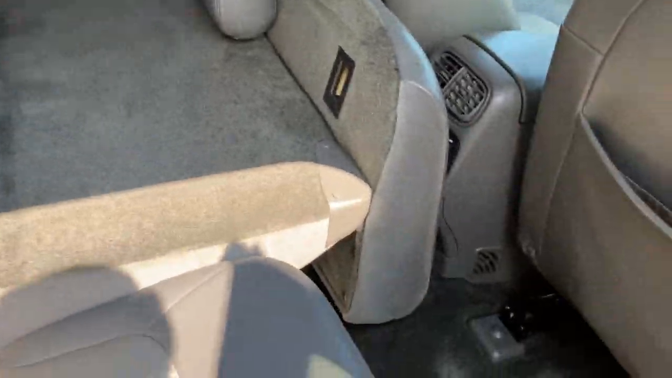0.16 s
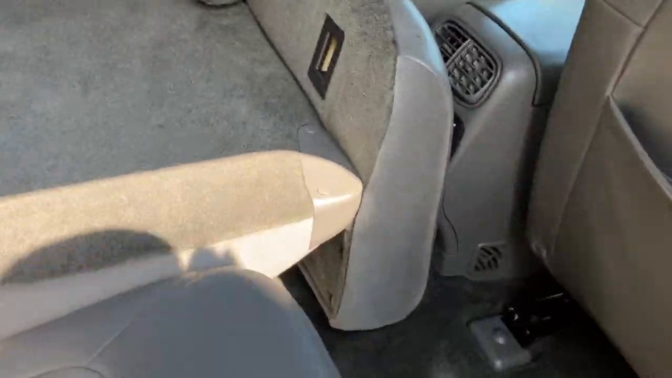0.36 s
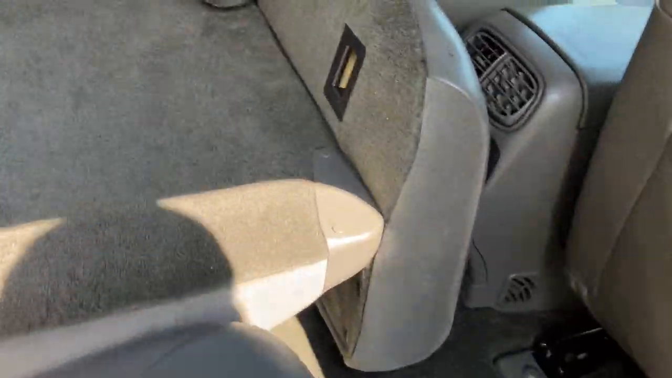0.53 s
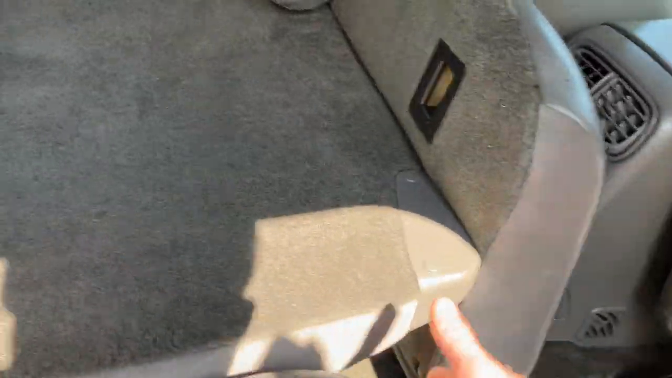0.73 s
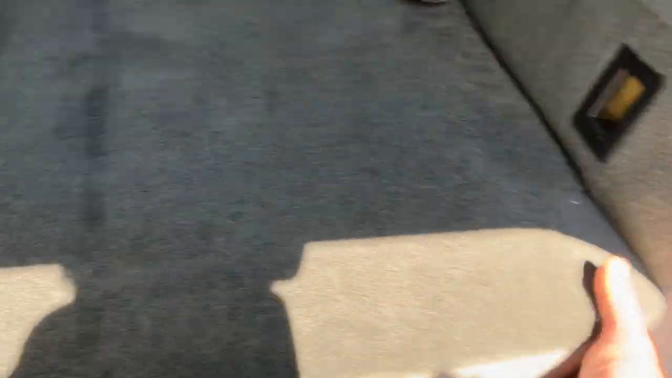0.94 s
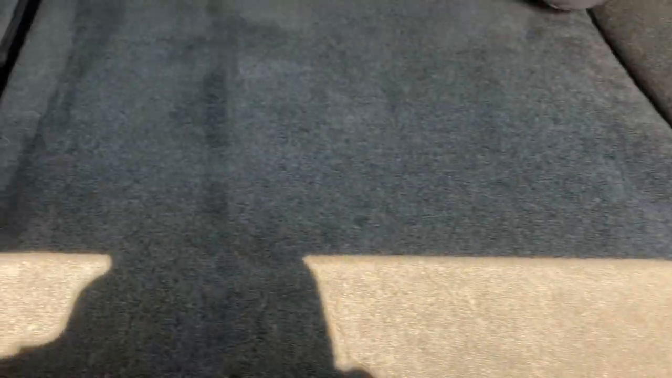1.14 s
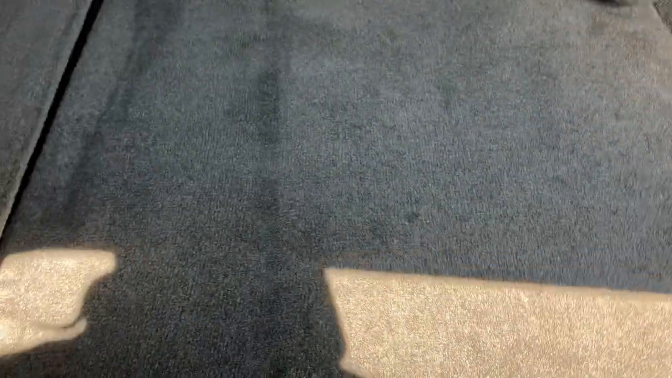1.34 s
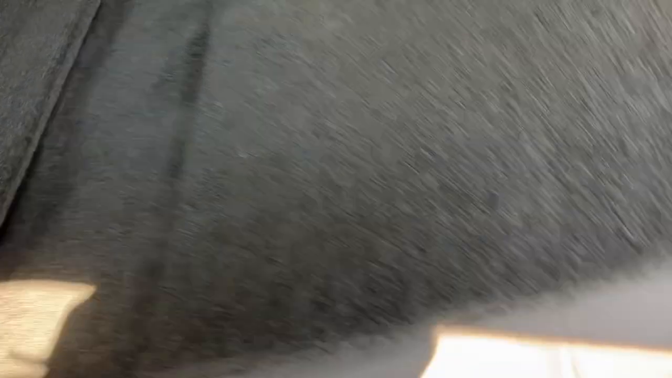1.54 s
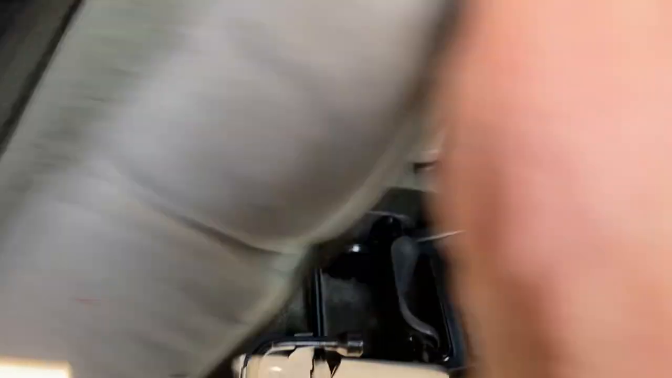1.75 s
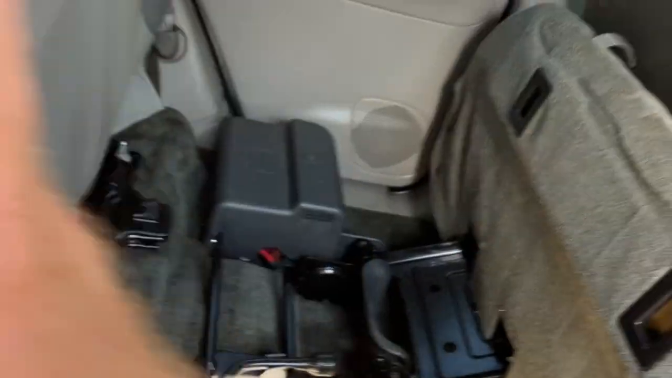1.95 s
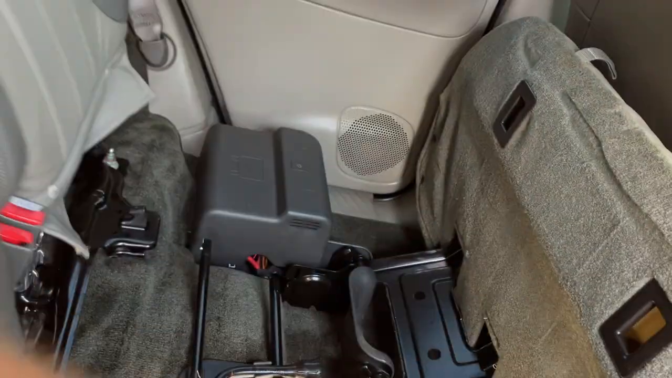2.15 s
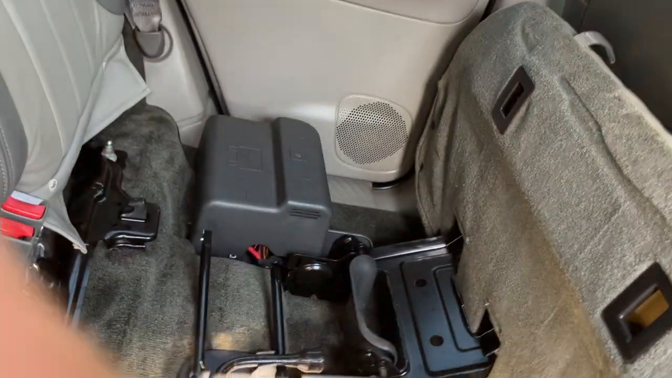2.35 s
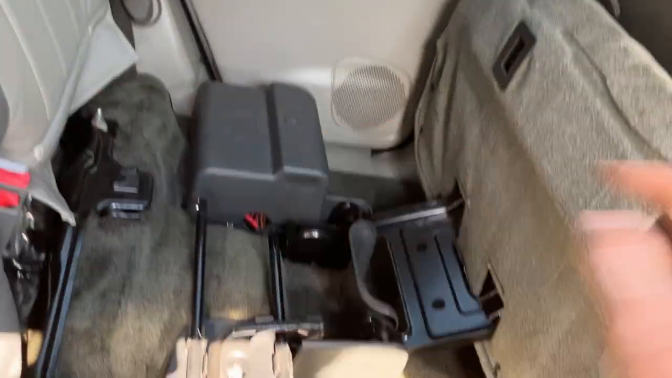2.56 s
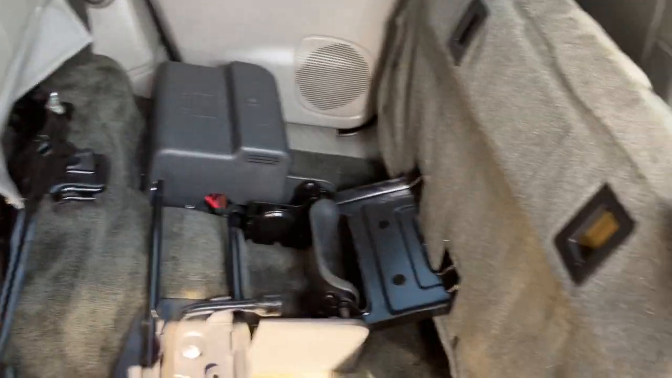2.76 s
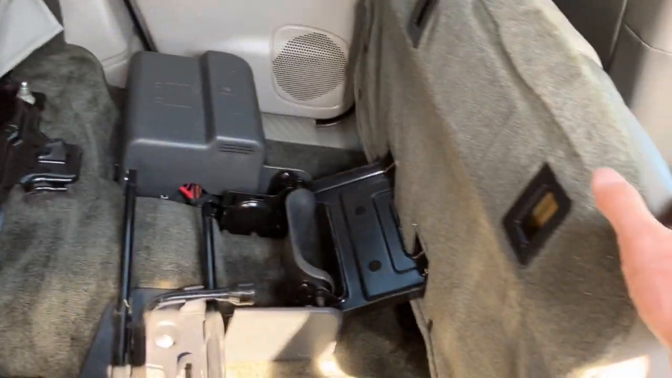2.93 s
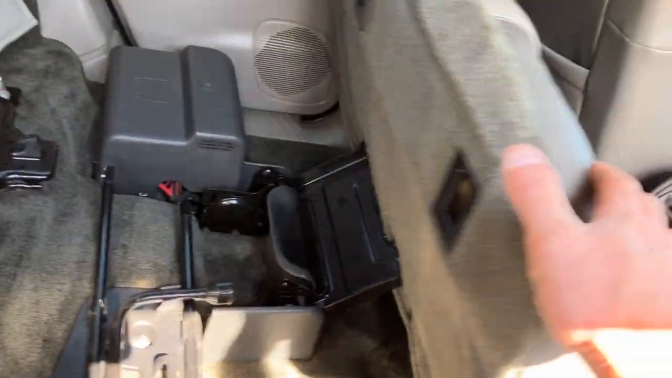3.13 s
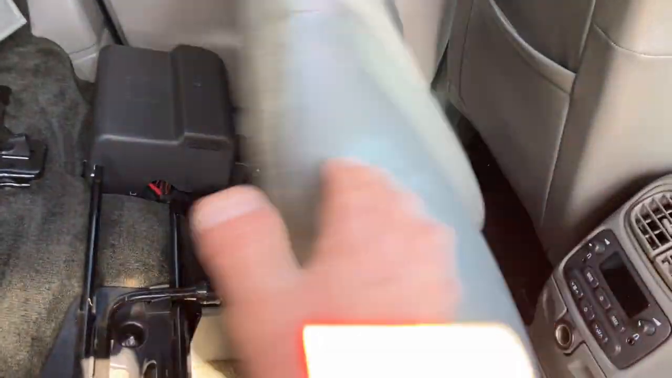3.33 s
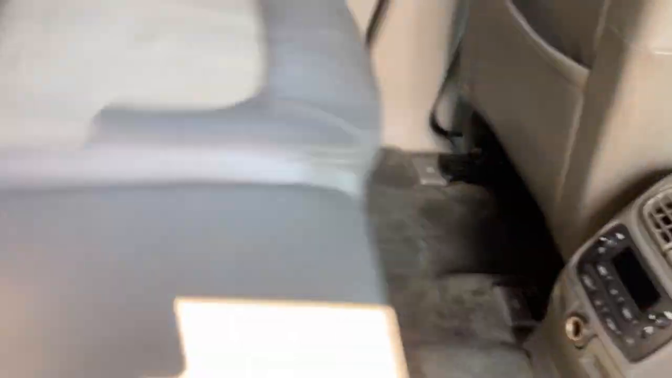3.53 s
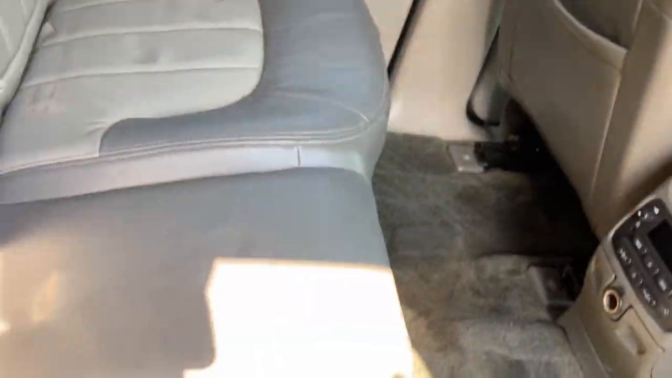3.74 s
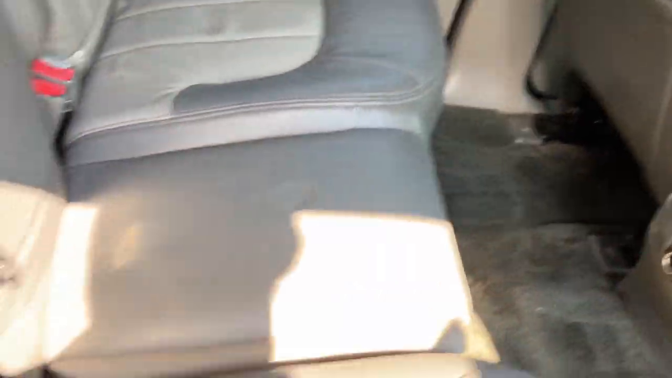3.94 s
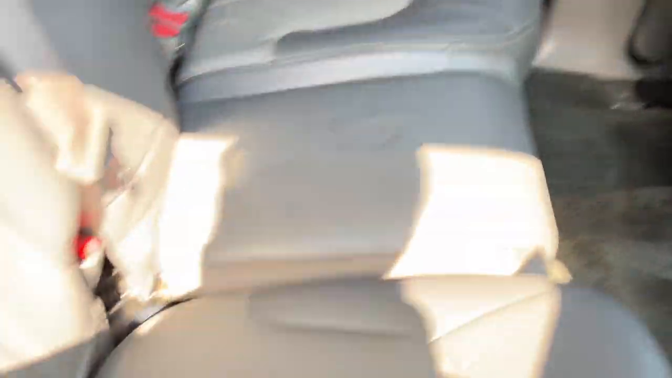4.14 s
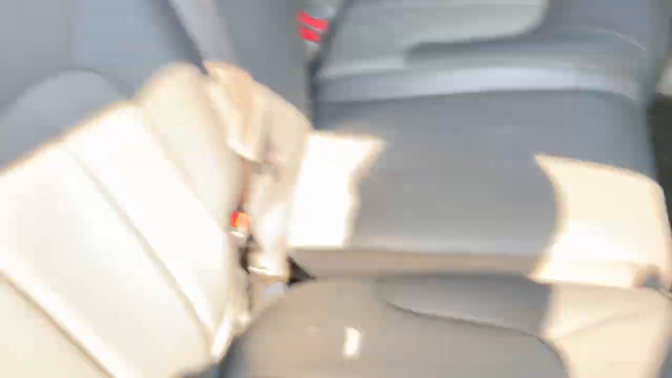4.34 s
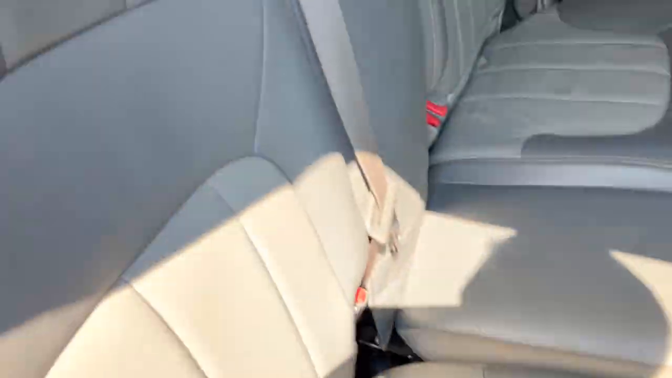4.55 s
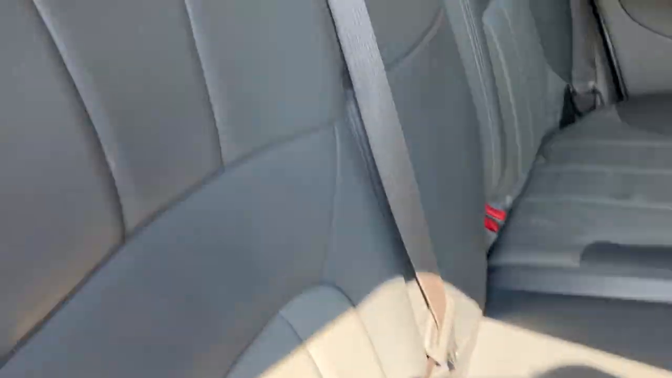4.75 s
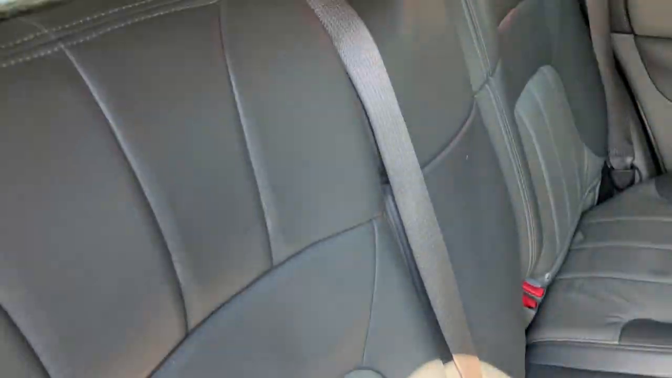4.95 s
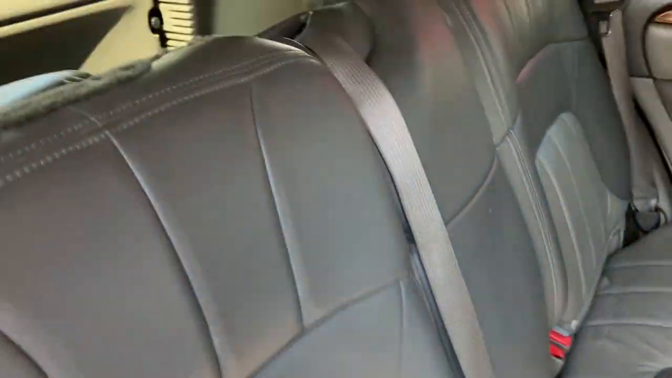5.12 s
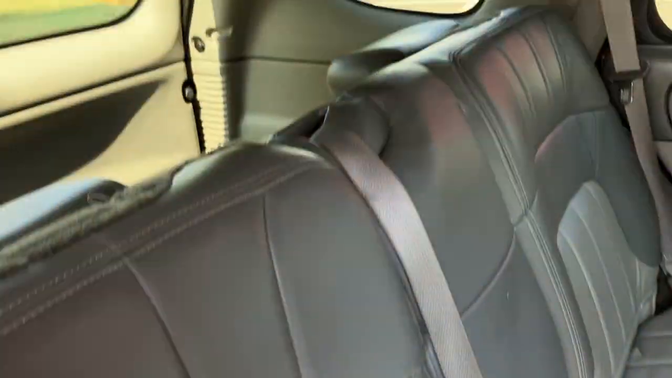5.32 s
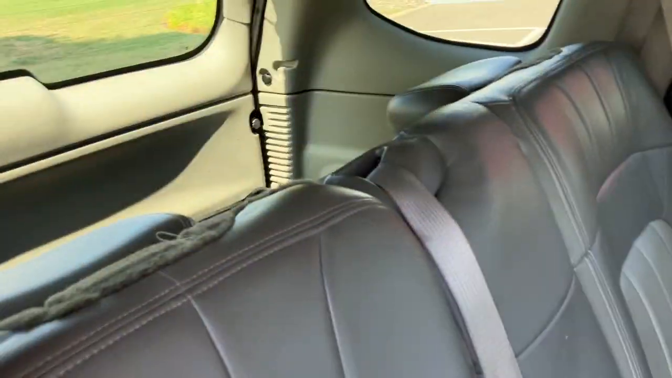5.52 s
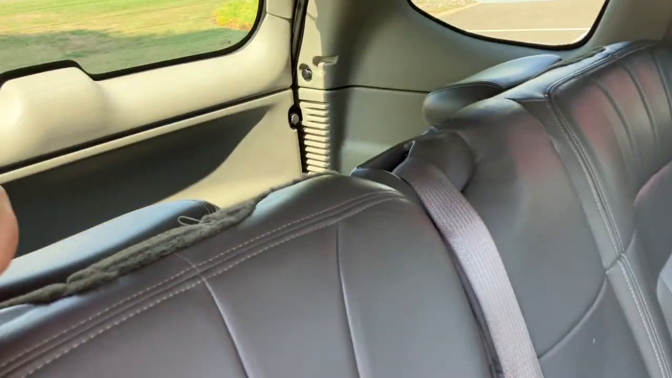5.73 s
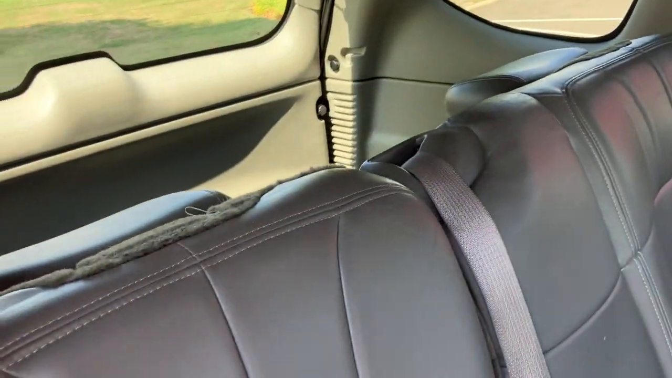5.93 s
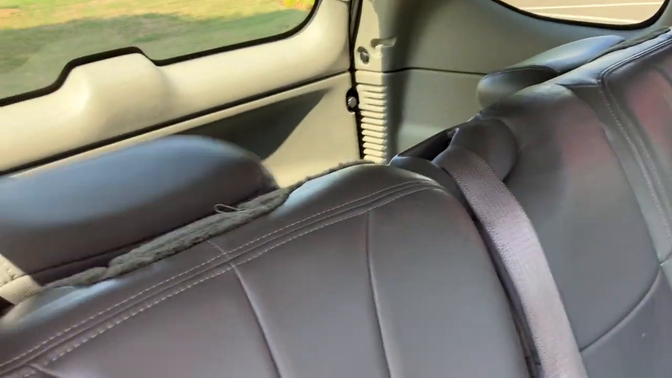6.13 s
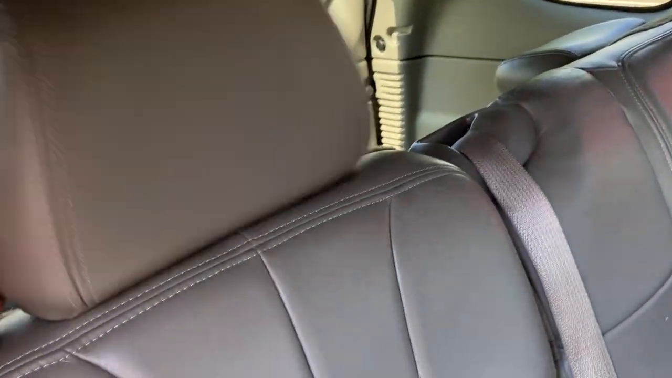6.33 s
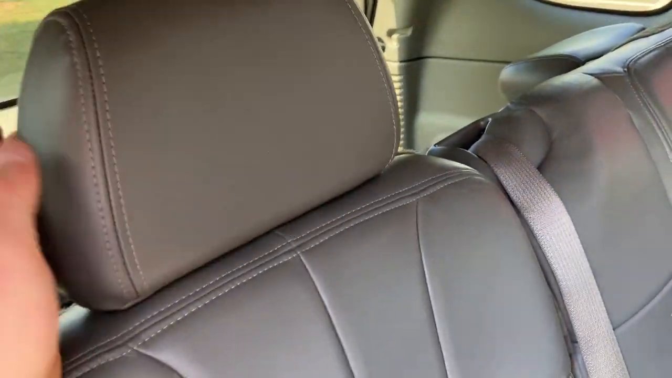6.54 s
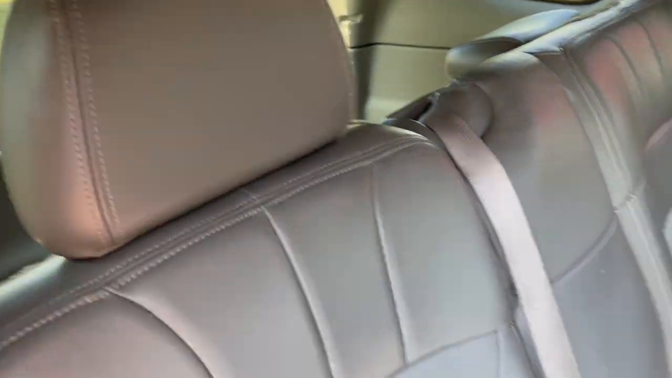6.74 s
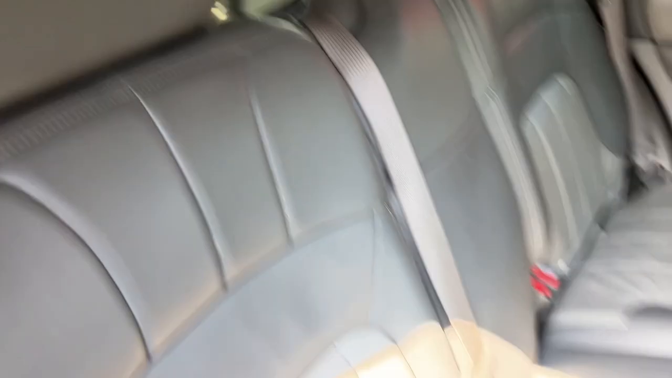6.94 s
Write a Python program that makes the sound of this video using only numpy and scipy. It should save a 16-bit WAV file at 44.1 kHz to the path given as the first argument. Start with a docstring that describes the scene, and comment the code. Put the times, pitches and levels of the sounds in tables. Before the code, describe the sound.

A hand-held stereo microphone sits close to a folding rear seat in a small, padded cabin. Fabric rustles and light bumps lead to a creak, a heavy metallic clunk and rattling springs. After a lull, an even little ratchet precedes a loud, dry cushion slap. Padded bumps and webbing sliding follow, then more brushing and a firm headrest knock with muffled thuds.

```python
"""Inside a parked car, close to a hand-held microphone with two ports, a folding rear seat is put back up.
The back creaks upright in uneven slips and bangs into its steel latch; the cushion ticks over on its hinge
and slaps down; a headrest is swung up and knocks home. Padded blows are short pushes that boom in the cabin,
hard blows are noise bursts that ring the frame. Hands brush the upholstery and a belt slides, as shaped noise."""
import sys
import numpy as np
from scipy import signal
from scipy.fft import rfft, irfft, next_fast_len
from scipy.io import wavfile
from scipy.ndimage import uniform_filter1d

SR = 44100
rng = np.random.default_rng(int(sys.argv[2]) if len(sys.argv) > 2 else 0)


def to_wav(sig):
    """Store sig (one row per channel, or 1-D mono) as 16-bit WAV at the path in sys.argv[1].

    Samples outside -1..1 are clipped; the rate is SR.
    """
    pcm = np.clip(np.atleast_2d(sig), -1, 1) * 32767
    pcm = np.round(pcm).astype(np.int16)
    wavfile.write(sys.argv[1], SR, pcm.T)  # frames by channels


N = 307818
TIME = np.arange(N) / SR


def amp(db):
    """Decibels to gain."""
    return 10 ** (np.asarray(db) / 20)


def evened(x):
    """Scaled to an rms of one."""
    return x / np.sqrt(np.mean(x ** 2) + 1e-20)


def read(points, hz):
    """A table joined by straight lines over log frequency."""
    f, value = np.transpose(points)
    return np.interp(np.log(hz + 1), np.log(f + 1), value)


def add(mix, s, sound):
    """Mixes a sound in at a time in seconds, cutting what runs past the end."""
    part = mix[..., round(s * SR):][..., :sound.shape[-1]]
    part += sound[..., :part.shape[-1]]


def noise(colour, size=N, tilt_db=0):
    """Two unrelated noises of one colour and rms one, tilted in dB per octave about 1 kHz."""
    n = next_fast_len(size)
    hz = np.fft.rfftfreq(n, 1 / SR)
    octaves = np.log2(np.maximum(hz, 250) / 1000)  # the tilt stops below 250 Hz
    spectrum = rfft(rng.standard_normal((2, n))) * amp(read(colour, hz) + tilt_db * octaves)
    return evened(irfft(spectrum, n)[:, :size])


def flutter(seconds):
    """Smooth random wobble of rms one that changes over the given time."""
    size = max(2, int(seconds * SR))
    once = uniform_filter1d(rng.standard_normal(N), size)
    return evened(uniform_filter1d(once, size))


def swell(start, length, rise):
    """A sliding movement: it speeds up, holds and slows to a stop."""
    release_share = 0.42  # the hand slows and lifts over this last part of a stroke
    up = np.clip((TIME - start) / max(rise, 1e-3), 0, 1)
    down = np.clip((start + length - TIME) / (release_share * length), 0, 1)
    return (np.sin(np.pi / 2 * up) * np.sin(np.pi / 2 * down)) ** 2


def ring(x, modes):
    """The ringing of damped modes driven by x; each has its gain at its own pitch."""
    t = np.arange(SR // 2) / SR
    response = 0
    for hz, db, t60 in modes:
        damping = np.log(1000) / t60
        decay = np.exp(-damping * t)
        response = response + amp(db) * 2 * damping / SR * decay * np.cos(2 * np.pi * hz * t)
    return signal.oaconvolve(x, response[None], axes=1)[:, :N]


# springs and trim rattling on: (frequency [Hz], time to fall 60 dB [s])
TAIL_T60 = [(300, 0.65), (1000, 0.29), (4000, 0.36), (14000, 0.37)]


def rattle(x):
    """A diffuse noise tail, scaled to unit energy in its first row, whose low end lasts longest."""
    hz, t, z = signal.stft(rng.standard_normal((2, SR // 2)), SR, nperseg=256)
    fading = z * amp(-60 * t / read(TAIL_T60, hz)[:, None])
    tail = signal.istft(fading, SR, nperseg=256)[1]
    return signal.oaconvolve(x, tail / np.linalg.norm(tail[0]), axes=1)[:, :N]


# still air of the parked car: (frequency [Hz], level per Hz [dB])
AIR_COLOUR = [(20, -15), (70, 5), (250, -5), (400, -10), (490, -12), (700, -17), (1500, -23), (4000, -28.5),
              (7500, -34), (10000, -40.5), (16000, -59)]
# a faint, narrow hum in the cabin: (frequency [Hz], level per Hz [dB])
HUM_COLOUR = [(330, -60), (395, -12), (412, 0), (430, -12), (500, -60)]


def still_air(air_db=-55, hum_db=-65):
    """The quiet cabin all around: steady air noise and a hum made of narrow-band noise."""
    return amp(air_db) * noise(AIR_COLOUR) + amp(hum_db) * noise(HUM_COLOUR)


# low rumble as the seat's weight shifts, before the trim: (time [s], level [dB])
SHIFTING = [(0, -44), (.45, -45), (0.682, -75), (1.05, -53.5), (1.25, -38.5), (1.85, -42.5), (2.3, -38.5),
            (3.0, -49), (3.52, -42), (3.68, -31), (4.099, -41), (4.8, -47.5), (5.5, -47.5), (5.92, -32),
            (6.25, -58), (6.42, -34), (6.75, -37), (6.92, -60)]
# its colour: (frequency [Hz], level per Hz [dB])
SHIFT_COLOUR = [(15, -37.5), (35, 1.5), (65, 2.5), (140, -2.5), (220, -13), (280, -12), (400, -21.5),
                (600, -31), (1500, -53)]


def shifting(trim_db=-1):
    """Low rumble of the seat moving on its springs: dark noise that follows the weight."""
    s, db = np.transpose(SHIFTING)
    return amp(np.interp(TIME, s, db) + trim_db) * noise(SHIFT_COLOUR)


# the seat belt running off its reel: (start [s], length [s], rise [s], level [dB])
BELT = [(4.423, 0.54, 0.014, -64.5), (5.014, 0.44, 0.086, -62)]
# colour of the webbing: (frequency [Hz], level per Hz [dB])
BELT_COLOUR = [(700, -21.5), (1350, -9.5), (1620, 4), (1900, -8), (2900, -11.5), (3700, -13.5), (4600, -13),
               (7500, -19), (16000, -37)]


def belt():
    """Webbing slides through its guide with a faint, whistling rasp."""
    level = sum(amp(db) * swell(start, length, rise) for start, length, rise, db in BELT)
    return level * noise(BELT_COLOUR)


# a sleeve swishing over smooth leather: (start [s], length [s], rise [s], pitch [Hz], level [dB])
SWISHES = [(1.953, 0.13, 0.018, 1610, -48), (5.576, 0.26, 0.074, 4850, -51), (6.477, .15, 0.016, 2424, -53)]


def swishes(width_octaves=0.41, skirt_db=-14):
    """Rubbing noise in one narrow band, falling by skirt_db for each width away from its pitch."""
    out = np.zeros((2, N))
    for start, length, rise, hz, db in SWISHES:
        band = [(hz * 2 ** (k * width_octaves), skirt_db * abs(k)) for k in (-4, 0, 4)]
        out += amp(db) * swell(start, length, rise) * noise(band)
    return out


def wander(x, depth_db):
    """The colour of the rub drifts as the contact moves over seams and padding."""
    z = signal.stft(x, nperseg=1024, noverlap=768)[2]
    patches = rng.standard_normal(z.shape[1:])
    for _ in range(2):
        across_pitch = uniform_filter1d(patches, size=6, axis=0)
        patches = uniform_filter1d(across_pitch, size=16, axis=1)
    drifting = z * amp(depth_db * evened(patches))
    return evened(signal.istft(drifting, nperseg=1024, noverlap=768)[1][:, :N])


def snags(per_s=45, level_db=-0.5, t60=0.004):
    """Seams catching under the hand: sparse, dry ticks of uneven size, levelled against the rub."""
    t = np.arange(SR // 40) / SR
    clicks = (rng.random(N) < per_s / SR) * rng.standard_normal(N)
    tick = noise(TICK_COLOUR, size=len(t)) * np.exp(-np.log(1000) * t / t60)
    return amp(level_db) * signal.oaconvolve(clicks[None], tick, axes=1)[:, :N]


# hand and sleeve stroking the upholstery, levels before the trims:
# (start [s], length [s], rise [s], dull drag [dB], rub [dB], hiss of the nap [dB])
STROKES = [(0.354, 0.28, 0.012, -51, -53, -55.5), (0.579, 0.23, 0.099, -53, -53.5, -48),
           (0.81, 0.26, 0.076, -55, -51.5, -51.5), (1.009, 0.19, 0.072, -60, -60, -59),
           (1.138, .37, 0.13, -45.5, -47.5, -53), (1.453, 0.24, 0.028, -50, -55, -61.5),
           (1.619, 0.21, 0.042, -49.5, -49, -46), (1.778, 0.21, 0.12, -38.5, -53.5, -56),
           (1.947, 0.25, 0.052, -48, -40, -53), (2.36, 0.33, 0.013, -58, -64, -70.5),
           (2.798, .15, 0.026, -56.5, -55.5, -64.5), (3.384, 0.19, 0.14, -65, -48.5, -54),
           (3.712, .27, 0.089, -54, -41, -42.5), (3.932, 0.36, 0.13, -49, -46.5, -54),
           (4.231, 0.23, 0.043, -55, -57, -62), (5.473, .18, 0.09, -67, -58.5, -62.5),
           (5.579, 0.44, 0.065, -48.5, -50.5, -49.5), (5.896, 0.32, 0.026, -53, -62, -74),
           (6.096, 0.42, 0.15, -48.5, -45.5, -46.5), (6.481, .18, .03, -67, -50.5, -50.5),
           (6.617, 0.4, 0.054, -62, -57, -66.5)]
# colour of a heavy drag over padding: (frequency [Hz], level per Hz [dB])
DRAG_COLOUR = [(150, -3.5), (340, 1), (500, -1.5), (680, -6), (900, -6), (1400, -14), (4000, -40.5)]
# colour of the rub: (frequency [Hz], level per Hz [dB])
RUB_COLOUR = [(500, -13.5), (900, -4.5), (1400, -1), (2000, -0.5), (3000, -0.5), (5000, -7.5), (8000, -10),
              (16000, -47)]
# colour of the nap's hiss: (frequency [Hz], level per Hz [dB])
NAP_COLOUR = [(1000, -27.5), (3000, -9.5), (5000, 0.5), (8000, 2.5), (12000, 5), (15000, 1.5)]


def upholstery(rub_trim_db=-1, nap_trim_db=1, catch_db=1.34, grain_db=2, judder_db=3):
    """Rubbed cloth: a dull drag, a rub and a bright hiss, all roughened as fibres catch and let go."""
    power = 0
    for start, length, rise, *levels_db in STROKES:
        power = power + np.outer(amp(levels_db), swell(start, length, rise)) ** 2
    drag, rub, nap = np.sqrt(power)
    drag = drag * evened(amp(judder_db * flutter(0.0066)))
    catching = evened(amp(catch_db * flutter(0.036) + grain_db * flutter(0.00026)))
    dull = drag * wander(noise(DRAG_COLOUR), depth_db=2.0)
    rubbing = amp(rub_trim_db) * rub * (wander(noise(RUB_COLOUR), depth_db=3.4) + snags())
    hiss = amp(nap_trim_db) * nap * wander(noise(NAP_COLOUR), depth_db=-2.6)
    return catching * (dull + rubbing + hiss)


# leather squeaking as it is squeezed: (time [s], length [s], mean pitch [Hz], level [dB])
SQUEAKS = [(0.772, 0.042, 1450, -56), (1.987, 0.1, 680, -42.5), (3.518, 0.011, 509, -40.5)]


def squeaks(waver=0.04):
    """Short wavering tones of leather sliding on leather."""
    out = np.zeros((2, N))
    for s, length, hz, db in SQUEAKS:
        size = int(length * SR)
        turns = np.cumsum(hz * (1 + waver * flutter(.003)[:size])) / SR
        add(out, s, amp(db) * signal.windows.tukey(size, .5) * np.sin(2 * np.pi * turns))
    return out


# the hinge sticking and slipping as the back rises: (time [s], mean rate [slips/s], mean level [dB])
CREAK = [(1.623, 24, -42), (1.70, 25, -41), (1.745, 50, -41), (1.80, 72, -41), (1.87, 74, -35),
         (1.90, 72, -37)]
# each slip runs along the frame, treble first
SLIP_HZ, SLIP_END_HZ, SLIP_GLIDE_S, SLIP_DECAY_S = 2300, 370, .0015, .002


def creak(uneven=.035, scatter_db=2):
    """Uneven slips of the hinge, quickening as the back swings up; each is a tiny falling chirp."""
    s, rate, db = np.transpose(CREAK)
    turns = np.cumsum(np.interp(TIME, s, rate, left=0) * (1 + uneven * flutter(.01))) / SR
    level = np.interp(TIME, s, amp(db), left=0, right=0)
    slips = np.diff(np.floor(turns), prepend=0) * level  # one impulse per whole turn
    slips = slips * amp(scatter_db * rng.standard_normal(N))
    t = np.arange(SR // 20) / SR
    hz = SLIP_END_HZ + (SLIP_HZ - SLIP_END_HZ) * np.exp(-t / SLIP_GLIDE_S)
    fade = (1 + t / SLIP_DECAY_S) * np.exp(-t / SLIP_DECAY_S)
    slip = fade * np.sin(2 * np.pi * np.cumsum(hz) / SR)
    return np.tile(signal.oaconvolve(slips, slip)[:N], (2, 1))


# modes of the seat's steel frame, before each part's ring level:
# (frequency [Hz], gain [dB], time to fall 60 dB [s])
FRAME = [(432, -5, .2), (689, 3, .2), (808, 7, .2), (1020, 5, .1), (1179, 3, .14), (1268, 7, .12),
         (1819, 5, .1), (1975, 5, .1), (2178, 9, .08), (2440, 8, .08), (2599, 9, .1), (3339, 6, .12),
         (3515, 6, .12), (4140, 3, .1), (4672, 7, .1), (6302, 6, .1), (7397, 8, .1)]


def strikes(rows, colour, ring_db, tail_db, chatter_db):
    """Hard contacts: a burst of tiny collisions, as noise, that rings the steel frame and leaves a rattle."""
    out, t = np.zeros((2, N)), np.arange(SR // 5) / SR
    for s, db, rise, t60, tilt_db in rows:
        shape = (1 - np.exp(-t / max(rise, 1e-4))) * np.exp(-np.log(1000) * t / t60)
        burst = noise(colour, size=len(t), tilt_db=tilt_db)
        add(out, s, amp(db) * shape / shape.max() * burst)
    out = out * evened(amp(chatter_db * flutter(0.0004)))
    return out + amp(ring_db) * ring(out, FRAME) + amp(tail_db) * rattle(out)


# small hinge and buckle ticks: (time [s], level [dB], time to fall 60 dB [s], tilt [dB/octave])
TICKS = [(.115, -52, 0.024, 3), (.764, -44, 0.027, -5), (0.795, -46, 0.019, 9), (1.475, -36.5, 0.035, -8),
         (1.581, -39.5, 0.017, -0.5), (1.618, -42, 0.032, -1), (2.742, -48.5, 0.13, 6.5),
         (3.119, -47.5, 0.019, 1), (3.154, -47.5, 0.019, 1), (3.371, -43.5, 0.075, -3),
         (3.391, -40, .03, -1.5), (3.406, -38.5, 0.18, -6.5), (4.438, -46, 0.048, 0),
         (4.463, -50, .039, 1.5), (5.150, -40, 0.014, .5)]
# their colour: (frequency [Hz], level per Hz [dB])
TICK_COLOUR = [(250, -1), (600, -1.5), (1400, 1), (3000, -4), (4600, -13.5), (6500, -19.5), (16000, -32)]
TICK_RISE_S = .0005
# the cushion's hinge ratchets evenly as it swings down
RATCHET_START_S, RATCHET_GAP_S, RATCHET_COUNT, RATCHET_RISE_S = 3.1795, .0418, 5, .0013
# level of the first tick, change per tick, ring time, tilt per octave
RATCHET_DB, RATCHET_FADE_DB, RATCHET_T60_S, RATCHET_TILT_DB = -43, -1.8, 0.047, 1.5
# loose links and springs clatter on after the latch shuts
CLATTER_START_S, CLATTER_S, CLATTER_COUNT, CLATTER_T60_S = 2.17, .26, 16, 0.042
CLATTER_DB, CLATTER_FALL_DB_PER_S, CLATTER_TILT_DB = -22, -105, -7  # tilt per octave


def ticks():
    """Hard contacts of small parts: single ticks, the hinge's fading ratchet and the loose clatter."""
    rows = [(s, db, TICK_RISE_S, t60, tilt_db) for s, db, t60, tilt_db in TICKS]
    for k in range(RATCHET_COUNT):
        s, db = RATCHET_START_S + k * RATCHET_GAP_S, RATCHET_DB + k * RATCHET_FADE_DB
        rows.append((s, db, RATCHET_RISE_S, RATCHET_T60_S, RATCHET_TILT_DB))
    # one clatter at a random moment in each of equal slots
    ages = CLATTER_S * (np.arange(CLATTER_COUNT) + rng.random(CLATTER_COUNT)) / CLATTER_COUNT
    for age in ages:
        db = CLATTER_DB + CLATTER_FALL_DB_PER_S * age
        rows.append((CLATTER_START_S + age, db, TICK_RISE_S, CLATTER_T60_S, CLATTER_TILT_DB))
    return strikes(rows, TICK_COLOUR, ring_db=-6.5, tail_db=-8.5, chatter_db=1)


# the headrest knocking on its stop:
# (time [s], level [dB], rise [s], time to fall 60 dB [s], tilt [dB/octave])
HEADREST = [(5.628, -41.5, 0.00089, 0.058, -4), (5.940, -33.5, 0.001, 0.045, -10.5),
            (5.986, -43, 0.00082, 0.072, -4.5), (6.197, -36, 0.0028, 0.073, 0),
            (6.362, -22, 0.003, 0.036, -0.5), (6.371, -23, 0.0011, 0.07, -1)]
# its colour when struck: (frequency [Hz], level per Hz [dB])
HEADREST_COLOUR = [(250, -16.5), (400, -4), (620, -10), (950, 0), (1400, -25), (2000, -10), (2800, -10.5),
                   (5500, -17), (7500, -14.5), (11000, -22.5), (16000, -23)]


def headrest():
    """Hard knocks of the headrest, with little frame ring."""
    return strikes(HEADREST, HEADREST_COLOUR, ring_db=-11, tail_db=-13.5, chatter_db=1.5)


# the cushion slapping onto its base:
# (time [s], level [dB], rise [s], time to fall 60 dB [s], tilt [dB/octave])
CUSHION = [(3.554, -31.5, 0.0016, 0.1, 2), (3.569, -27.5, 0.017, 0.12, 0), (3.582, -24.5, 0.0015, .04, 13),
           (3.587, -11.5, 0.0028, 0.039, -0.5), (3.594, -1.5, 0.0046, 0.046, -2),
           (3.602, -24.5, 0.0012, 0.014, -5.5), (3.650, -28.5, 0.0061, 0.034, -2.5)]
# its colour when struck: (frequency [Hz], level per Hz [dB])
CUSHION_COLOUR = [(160, -29.5), (255, 3.5), (400, -10), (600, -9), (850, -14.5), (1250, -7.5),
                  (1490, -18.5), (2640, -12.5), (2770, -14.5), (4020, -21.5), (8360, -21), (8920, -31.5),
                  (11000, -27.5), (16000, -32)]


def cushion():
    """The slap of the cushion, rough in level and the driest of the hard contacts."""
    return strikes(CUSHION, CUSHION_COLOUR, ring_db=-17, tail_db=-19.5, chatter_db=4)


# the steel latch snapping and rattling:
# (time [s], level [dB], rise [s], time to fall 60 dB [s], tilt [dB/octave])
LATCH = [(1.786, -30, .003, 0.022, 4.5), (1.984, -32.5, 0.0006, 0.018, 2.5),
         (2.096, -19, 0.00023, 0.075, 1), (2.097, -17, 0.0014, 0.031, 2.5),
         (2.185, -19, 0.00068, 0.017, 0.5), (2.263, -33.5, 0.00077, 0.053, 3.5)]
# its colour when struck: (frequency [Hz], level per Hz [dB])
LATCH_COLOUR = [(240, -24), (400, 12), (814, -44), (921, -23), (1450, -22.5), (2050, -14.5), (2500, -20),
                (3020, -22.5), (4240, -24), (6440, -30), (8900, -38), (11000, -39), (16000, -42.5)]


def latch():
    """The snap of steel on steel, which rings the frame most strongly."""
    return strikes(LATCH, LATCH_COLOUR, ring_db=2, tail_db=-2, chatter_db=1.5)


# the seat back banging against its stops:
# (time [s], level [dB], rise [s], time to fall 60 dB [s], tilt [dB/octave])
BACK = [(1.930, -30.5, 0.0017, 0.097, 4.5), (2.141, -18.5, .002, 0.031, 1.5),
        (2.145, -11.5, 0.0011, 0.066, -1.5), (2.152, -10, 0.0012, 0.037, 1),
        (2.164, -22.5, 0.0021, 0.095, 1), (2.198, -19.5, 0.00063, 0.081, -3.5),
        (2.223, -22.5, 0.0011, .05, -6), (2.263, -26, 0.00055, 0.059, -4.5),
        (2.347, -39.5, 0.00048, 0.079, 0.5), (2.466, -34.5, 0.0015, 0.046, -6)]
# its colour when struck: (frequency [Hz], level per Hz [dB])
BACK_COLOUR = [(190, -24.5), (330, -8.5), (449, -1.5), (685, -14), (833, -13), (1150, -19.5), (1250, -20),
               (2100, -20), (3370, -28.5), (7830, -36.5), (9360, -43.5), (10800, -39), (16000, -45)]


def seat_back():
    """Hard bangs of the seat back, with little frame ring and some rattle."""
    return strikes(BACK, BACK_COLOUR, ring_db=-11.0, tail_db=-10.5, chatter_db=3.5)


# soft blows of padded, heavy parts:
# (time [s], level [dB], pitch [Hz], first touch against the blow [dB])
THUMPS = [(.392, -27.5, 149, -11), (.416, -27, 105, -28), (0.501, -24, 153, -29), (1.574, -31, 440, -15),
          (1.932, -15.5, 394, -33), (1.939, -14, 150, -28), (2.015, -22.5, 147, -10),
          (2.125, -15.5, 148, -23), (2.156, -4.5, 101.4, -14), (2.473, -39.5, 185, 8),
          (2.748, -32, 97.5, -16), (2.922, -37.5, 286, -10), (3.558, -22, 155, -10), (3.608, -3, 157, -6),
          (3.748, -22.5, 75, -20), (3.795, -27.5, 133, -1), (3.839, -18.5, 130, -3.5),
          (3.884, -21, 104, -5.5), (3.938, -26.5, 60.5, -10), (3.995, -27, 85, -19), (4.481, -27, 70, -6.5),
          (4.522, -22, 78.8, -21.5), (5.151, -38, 390, -22), (5.639, -24.5, 155, 1), (5.731, -18, 86.4, -2),
          (5.813, -20.5, 126, -23), (5.923, -32, 149, -15), (5.941, -18, 293, -23),
          (6.208, -37.5, 205, -15), (6.377, -11, 145, -6), (6.516, -25, 99, -24), (6.586, -34, 90, -19),
          (6.636, -32.5, 149, -4.5), (6.719, -15.5, 277, -27)]
TOUCH_LEAD_S, TOUCH_PITCH_RATIO = 0.00753, 1.92  # the taut cover meets first, earlier and higher
# heavy parts rebounding after a blow, level and pitch before they weaken, soften and scatter:
# (first rebound [s], time between [s], lasting [s], level [dB], pitch [Hz])
REBOUNDS = [(2.196, 0.036, 0.22, -5, 137), (3.629, 0.014, 0.027, -12, 142),
            (5.950, 0.031, 0.14, -27.5, 118.6), (6.403, .0215, 0.032, -15.5, 111)]
REBOUND_FALL_DB, REBOUND_SAG = -27.5, 0.39  # lost by the end of the rebounds: level, share of the pitch
REBOUND_SCATTER = .08  # largest random share of the pitch, either way
RECOIL_S, RECOIL_DB = .012, -10  # each rebound is caught by the opposite stop


def blows():
    """Every padded contact as (s, dB, Hz): first touch and blow, then weakening, softening rebounds."""
    for s, db, hz, touch_db in THUMPS:
        yield s - TOUCH_LEAD_S, db + touch_db, hz * TOUCH_PITCH_RATIO
        yield s, db, hz
    for s, gap, length, db, hz in REBOUNDS:
        for age in np.arange(0, length, gap):
            level_db = db + REBOUND_FALL_DB * (age / length) ** 2
            scatter = 1 + REBOUND_SCATTER * rng.uniform(-1, 1, 2)
            pitch, recoil_pitch = hz * (1 - REBOUND_SAG * age / length) * scatter
            yield s + age, level_db, pitch
            yield s + age + RECOIL_S, level_db + RECOIL_DB, recoil_pitch


# air and panel modes of the cabin, before the boom level:
# (frequency [Hz], gain [dB], time to fall 60 dB [s])
CABIN = [(60.3, 14.5, 0.29), (84.1, 0.5, 0.21), (120.3, 1.5, 0.5), (160.5, 2.5, 0.29), (180.7, 1, 0.12),
         (253.8, 1, 0.16), (312.6, -3, 0.084), (434, 4.5, 0.34)]


def thumps(swell_cycles=0.44, boom_db=-1, tail_db=-15):
    """Each padded blow is a push that soon dies away and sets the cabin booming."""
    out, t = np.zeros((1, N)), np.arange(SR // 6) / SR
    for s, db, hz in blows():
        u = t * hz / swell_cycles
        add(out, s, amp(db) * u * np.exp(1 - u) * np.sin(2 * np.pi * hz * t))
    direct = (out + amp(boom_db) * ring(out, CABIN))[0]
    # the pressure difference across the ports is a quarter cycle off
    across = signal.hilbert(direct, next_fast_len(N)).imag[:N]
    return np.array([direct, across]) + amp(tail_db) * rattle(out)


# likeness of the two microphone ports: (frequency [Hz], likeness [0-1])
LIKENESS = [(100, .95), (300, .88), (700, .7), (2000, .6), (5000, .55), (8000, .8), (9300, .97),
            (16000, .96)]
# phase between them: (frequency [Hz], lead of the left [rad])
PORT_PHASE = [(300, 0), (900, .6), (2200, -2), (3000, -2.2), (4100, 0), (5300, 1.9), (6900, 0),
              (9250, -3.14), (11400, -6.28), (13650, -9.42), (15800, -12.57)]
# level between them: (frequency [Hz], left minus right [dB])
BALANCE = [(170, 0), (350, 2), (1200, 2.5), (2500, 1.4), (4500, .2)]


def ports(x):
    """The first row reaches both ports alike, the second with opposite signs; the treble arrives out of step."""
    n = next_fast_len(N + SR // 10)
    hz = np.fft.rfftfreq(n, 1 / SR)
    same = np.clip(read(LIKENESS, hz), 0, 1)
    common, apart = rfft(x, n) * np.sqrt([(1 + same) / 2, (1 - same) / 2])
    # half of the level and phase difference goes to each port
    lean = amp(read(BALANCE, hz) / 2) * np.exp(.5j * read(PORT_PHASE, hz))
    return irfft(np.array([(common + apart) * lean, (common - apart) / lean]), n)[:, :N]


def scene():
    """The cabin, the hands and all parts of the seat, picked up at the two ports."""
    background = still_air() + shifting()
    sliding = belt() + swishes() + upholstery() + squeaks() + creak()
    hard = ticks() + headrest() + cushion() + latch() + seat_back()
    return ports(background + sliding + hard + thumps())


def record(dry):
    """The microphone loses the lowest bass and rounds off the loudest peaks; then the band limit."""
    heard = signal.sosfilt(signal.butter(1, 12, "high", fs=SR, output="sos"), dry)
    rounded = heard / (1 + (heard / .95) ** 6) ** (1 / 6)
    lowpass = signal.firwin(511, 16200, window=("kaiser", 9), fs=SR)
    return signal.oaconvolve(rounded, lowpass[None], "same")


dry = scene()
out = record(dry)
to_wav(out)
```